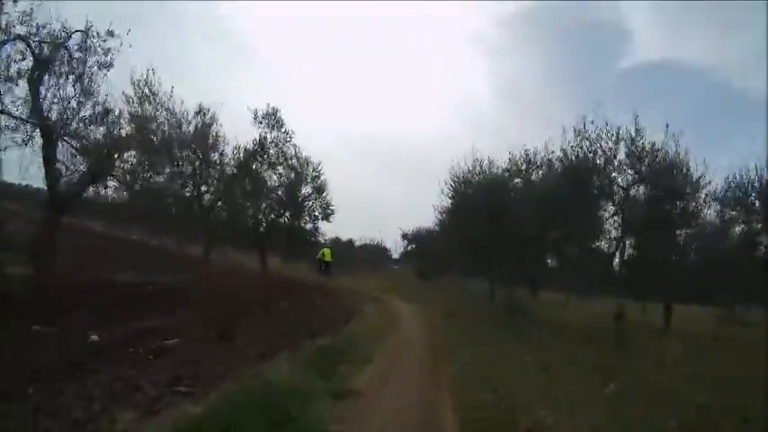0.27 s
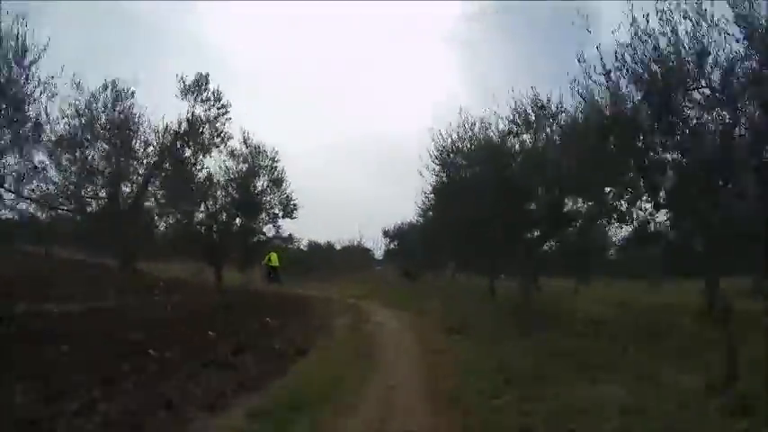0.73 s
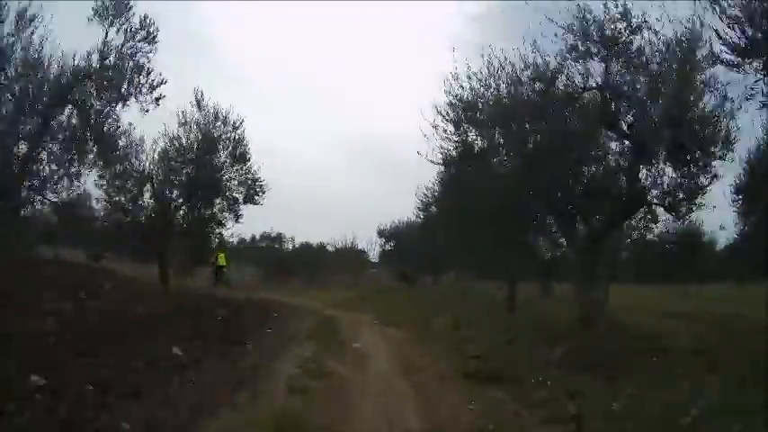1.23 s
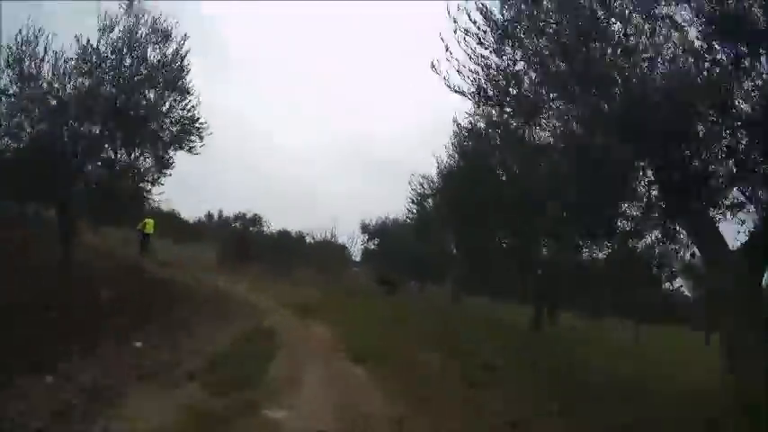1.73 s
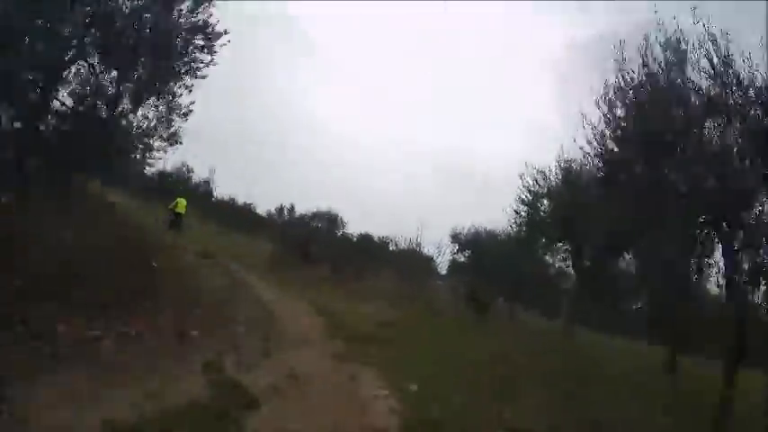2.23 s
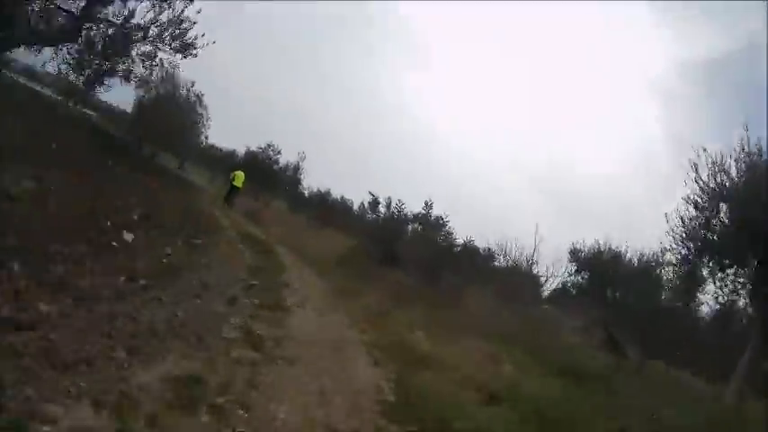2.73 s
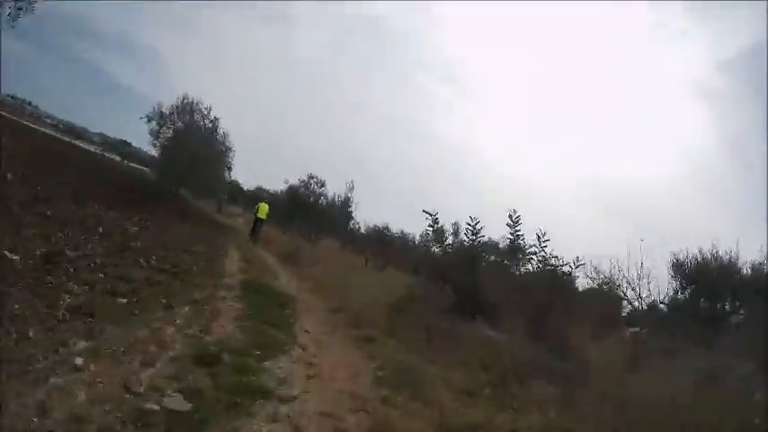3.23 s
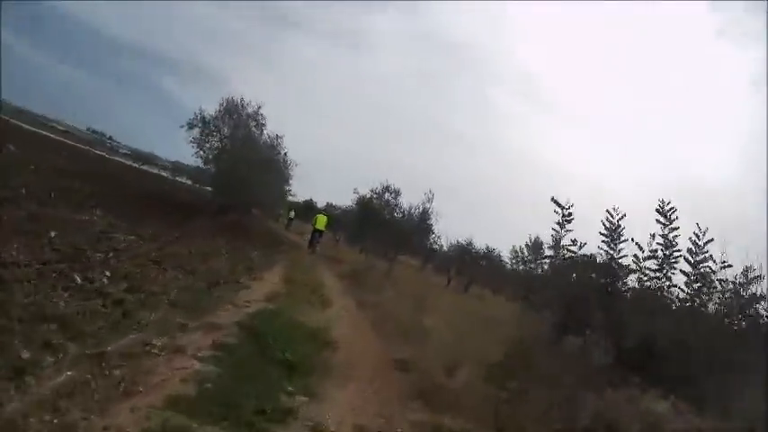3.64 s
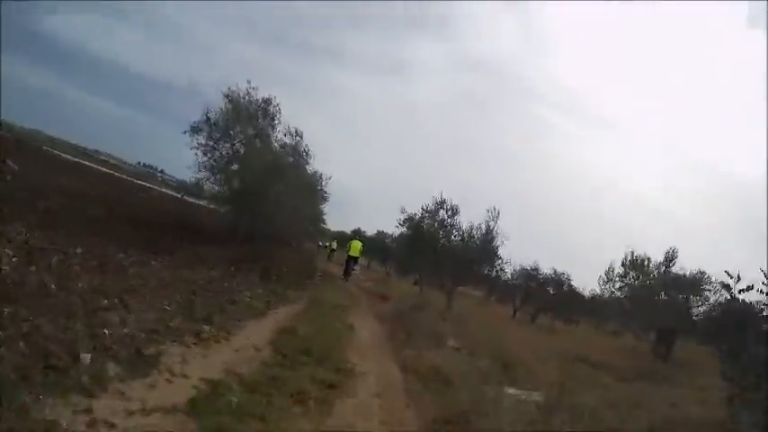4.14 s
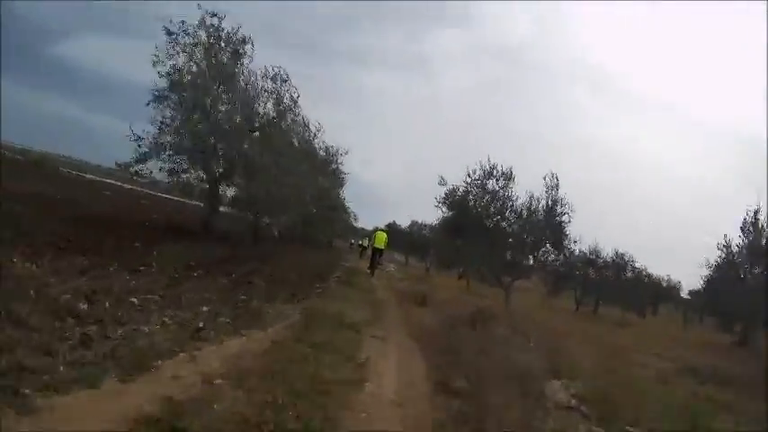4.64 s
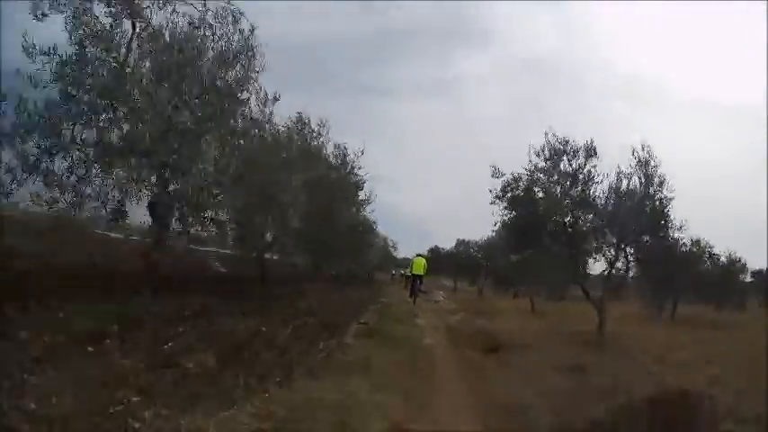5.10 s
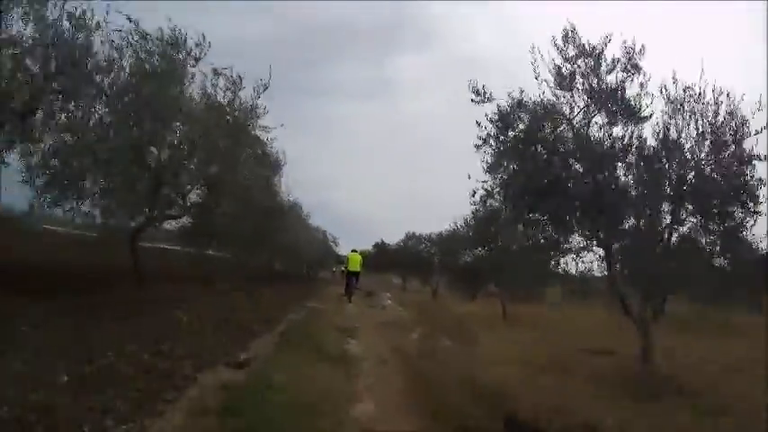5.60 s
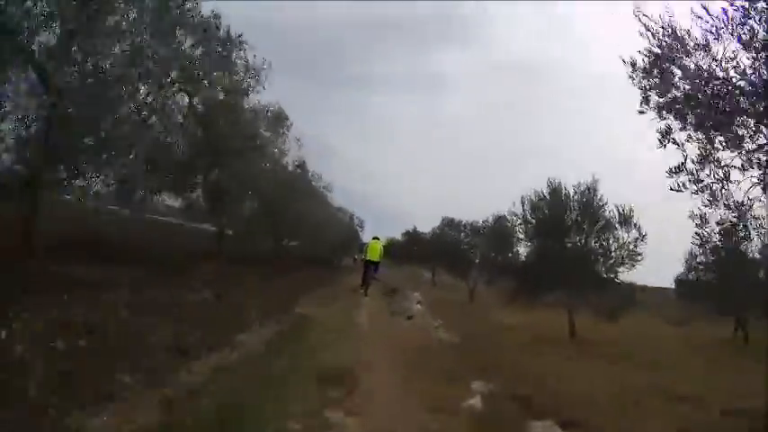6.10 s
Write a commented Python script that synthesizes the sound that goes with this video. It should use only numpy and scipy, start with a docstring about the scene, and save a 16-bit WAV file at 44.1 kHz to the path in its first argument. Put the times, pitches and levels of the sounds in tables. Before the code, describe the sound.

Low wind buffets a bike-mounted microphone over faint gritty tyre hiss, while the loose plastic mount ticks and rattles sharply, with a hard knock near the end.

```python
"""Camera on a bicycle, rough dirt track

Wind noise in four bands buffets the microphone port; single puffs thump its cavity.
Tyres hiss and roar over grit: flickering noise bands with random grains.
The camera ticks and rattles in its loose plastic mount, and the mount knocks on the handlebar:
bursts of noisy contacts ring banks of resonances. The input clips hard; the top is cut."""
import sys
import numpy as np
from scipy import signal
from scipy.io import wavfile
from scipy.ndimage import uniform_filter1d

SR = 44100
rng = np.random.default_rng(int(sys.argv[2]) if len(sys.argv) > 2 else 0)


def log_audio(samples):
    """Write samples as a 16-bit WAV file to the path given in sys.argv[1]."""
    # one column per channel
    frames = np.atleast_2d(samples).T
    # limit to full scale, then quantise
    limited = np.clip(frames, -1, 1)
    pcm = np.round(limited * 32767).astype(np.int16)
    wavfile.write(sys.argv[1], SR, pcm)


N = 280476   # samples

# wind at the port, before random swells and lumps: time_s, buffet_db, rumble_db, flutter_db
WIND_CURVE = [(0.0, -15, -23, -37.5), (0.21, -18, -23.5, -32), (0.55, -34, -33, -42), (0.65, -15, -20, -39),
              (0.69, -22, -29, -38), (1.2, -27.5, -31.5, -38.5), (1.29, -42, -26.5, -43),
              (1.33, -17, -28.5, -36.5), (1.42, -12, -18.5, -28), (1.45, -21, -32.5, -42.5),
              (1.57, -22.5, -28, -33), (1.91, -23.5, -32.5, -34), (2.02, -9.5, -18, -34.5),
              (2.09, -22.5, -28.5, -39), (2.21, -24, -27.5, -40), (2.76, -25.5, -34.5, -35),
              (2.8, -18, -25, -39), (3.1, -30, -32.5, -36), (3.17, -18, -23, -34.5),
              (3.47, -26, -31.5, -38.5), (3.88, -16, -23, -28), (4.02, -28, -26, -40),
              (4.22, -19, -24.5, -30.5), (4.29, -22, -28, -40), (4.82, -13, -17, -28.5),
              (4.85, -20, -21, -29.5), (4.92, -14, -32, -34.5), (4.99, -30, -22.5, -36),
              (5.23, -11, -26.5, -30), (5.31, -30, -26, -42), (5.38, -11.5, -23, -32),
              (5.53, -32, -21, -31), (5.56, -15.5, -26.5, -36), (6.15, -23, -22, -33),
              (6.31, -17.5, -34, -36), (6.36, -23, -18.5, -31)]
# ground roughness, heard as grit hiss: time_s, hiss_db
GROUND_CURVE = [(0.0, -49), (1.24, -51), (1.4, -42.5), (1.82, -46), (3.19, -46.5), (3.5, -44),
                (3.81, -46.5), (4.3, -43), (4.85, -45.5), (5.44, -42.5), (6.16, -42), (6.36, -45)]
# camera ticking in its mount: time_s, case_peak_db, mount_peak_db, length_ms
TICK_EVENTS = [(0.0898, -10.5, -29, 0.9), (0.1175, -21.5, -42, 1), (0.173, -21.5, -31, 1.6),
               (0.1975, -18, -32, 1.8), (0.3384, -34, -31, 0.83), (0.6045, -30.5, -37, .9),
               (1.3231, -42, -31, 1.7), (1.3502, -33, -29, 1.4), (1.372, -7, -18, 2.7),
               (1.4108, 1.5, -11.5, 2.7), (1.4463, -4.5, -17.5, 2.35), (1.4745, -24, -39, 1.1),
               (1.4888, -5, -17.5, 1.4), (1.5062, -10, -30, 2.1), (1.5274, -18, -30, 2.8),
               (1.5625, -24, -18, 1), (1.5799, -7, -21, 2), (1.6251, -9, -23.5, 1.7),
               (1.6998, -25.5, -43, 1.9), (1.8726, -12.5, -23.5, 3), (1.8898, -8, -25, 2.2),
               (1.9451, 0, -21, 1.8), (1.9647, -7.5, -21.5, 4.6), (1.9841, -7.5, -29, 1.9),
               (2.0279, -7, -18, 1.7), (2.066, -16.5, -30, 2.4), (2.1036, -10, -25, 2.6),
               (2.1192, -4.5, -15, 1.7), (2.1463, -17.5, -41, 2.3), (2.1655, -22, -31, 1.7),
               (2.2702, -22, -26, .82), (2.324, -19.5, -31.5, 4.2), (2.3764, -20, -48, 0.85),
               (2.4244, -14, -32, 1.5), (2.439, -31, -23.5, 1.7), (2.502, -16.5, -29, .9),
               (2.6116, -25, -32, .88), (2.6539, -17, -23, 1.6), (2.7794, -10.5, -27, 1.7),
               (2.8203, -5, -18.5, 1.24), (3.1017, -21.5, -46, .7), (3.1615, -13, -27, 1),
               (3.2166, -13.5, -30, 1.2), (3.2462, -18, -28, 1.3), (3.2848, -22.5, -25.5, 2.5),
               (3.3125, -11.5, -21.5, 1.8), (3.326, -9, -31, 1.3), (3.3686, -14.5, -24.5, 3.4),
               (3.3983, -3, -26, 1.4), (3.4268, -9.5, -26.5, .82), (3.4422, -31, -25.5, 1.7),
               (3.5002, -13, -26.5, .89), (3.5456, -28, -28, 2.2), (3.5701, -2.5, -23, 1.6),
               (3.5877, -3, -17, 2.5), (3.605, -15, -27, .81), (3.6283, -5.5, -25, 1.9),
               (3.658, -24, -30, 2.1), (3.6759, -12.5, -30, 3.5), (3.7177, -20.5, -48, 1.5),
               (3.7869, -7, -27, 2.4), (3.8097, -6.5, -20, 2.34), (3.8384, -29, -26.5, 2.5),
               (3.962, -20, -28, 0.8), (3.9726, -26.5, -24, 5.3), (4.0206, -35, -22.5, .6),
               (4.05, -25, -22, 0.92), (4.071, -4.5, -20, 1.44), (4.1377, -24, -23, 4),
               (4.1484, -2.5, -19, 1.5), (4.1931, -4, -19, 1.5), (4.2309, -28, -27, 2.7),
               (4.2425, -6.5, -17, 1.4), (4.2573, 4, -4, 4.1), (4.3066, -11, -27, 2.8),
               (4.368, -34, -24.5, 1.6), (4.4117, -2.5, -15.5, 6.5), (4.4471, -15.5, -29, .87),
               (4.5196, -24, -31, 5.3), (4.5534, -22, -30, .8), (4.5681, -24, -20, 1.8),
               (4.6053, -18, -32, 1.1), (4.6741, -11, -42, 1), (4.7472, -31, -17, 0.98),
               (4.7594, -12.5, -23, 1.7), (4.782, -11, -9.5, 3.7), (4.7915, -17, -16, 0.84),
               (4.798, -3, -32, 0.85), (4.8059, -23, -19, 2.3), (4.814, -18, -26, 1.4),
               (4.8282, -8.5, -21, 1.4), (4.8389, -8.5, -28, 1.9), (4.859, -17, -38, 2.2),
               (4.8984, -7, -16.5, 2.2), (4.938, -13, -29, 1.4), (5.058, -34, -27, 0.84),
               (5.0994, -8.5, -27, 1.4), (5.189, -3, -17, 3.5), (5.2005, -1, -27, 1),
               (5.204, -12, -30, 2.9), (5.2093, -10, -10, 3.6), (5.2246, -13, -6, 1.4),
               (5.2514, -9, -21, 2.3), (5.2949, -17, -21, 2.3), (5.3098, -7, -26, .6),
               (5.3809, -6, -23, 4.5), (5.3997, -1, -15.5, 2.3), (5.4169, -11, -33, 1.3),
               (5.4271, -4.5, -29, 1.4), (5.45, -13, -29, .82), (5.5513, -22, -24.5, 4.2),
               (5.6037, -0.5, -34, 3.1), (5.6367, -27, -36, 3.1), (5.6476, -26, -31, 2.6),
               (5.671, -17.5, -25, 1.9), (5.7154, -13, -30, 1.7), (5.7328, -22, -36, 1.3),
               (5.8292, -17, -31, 1.4), (5.8529, -13, -26, 1.2), (5.9045, -26, -22.5, 2.2),
               (5.9178, -14.5, -34, 2.1), (5.9643, -11.5, -27, 2.2), (5.9838, -8, -30, 2.8),
               (6.0356, -6.5, -35, 1.6), (6.0524, -2.5, -13, 3.06), (6.0914, 0, -27, 1.24),
               (6.1211, -3, -18, 2.2), (6.1645, -8.5, -23, 1.1), (6.1789, -1, -23, 0.85),
               (6.2034, -24, -33, 4.6), (6.2414, -10, -21.5, 2.7), (6.3091, -12.5, -28, .81)]
# sharp puffs of wind on the port, before the band-pass: time_s, peak_db
PUFF_EVENTS = [(1.408, -20), (1.534, -23), (1.559, -11.5), (3.774, -19), (3.8, -31), (3.818, -19),
               (3.834, -16), (3.851, -31), (3.867, -34), (3.877, -17), (3.884, -16), (4.782, -10)]
# mount knocking on the handlebar, before the band-pass: time_s, peak_db
KNOCK_EVENTS = [(1.411, -25), (1.56, -30), (3.881, -28), (3.97, -17), (4.257, -18.5), (4.414, -26),
                (4.781, -19), (5.151, -7), (5.163, -0.5), (5.197, -25), (5.217, -22.5), (5.225, -31),
                (5.295, -25.5), (5.603, -26)]
# contacts running together: start_s, fade_start_s, gain_db, fade_ms, handlebar_db
RATTLE_EVENTS = [(4.425, 4.424, -28, 3.9, -40), (4.756, 4.777, -34.5, 3, -44),
                 (4.783, 4.801, -27.5, 4.4, -34), (4.808, 4.822, -34.5, 7.2, -44),
                 (5.146, 5.154, -32, 2, -24), (5.153, 5.176, -13.5, 6, -16.5), (5.181, 5.183, -12, 3, -27),
                 (5.188, 5.226, -22.5, 5.7, -47)]

# spectrum of the grit noise, relative: frequency_hz, density_db_per_hz
GRIT_SPECTRUM = [(410, -25), (700, -8.5), (1250, -3.5), (2110, -3), (3300, -10.5), (6690, -10),
                 (8640, -6.5), (13200, -26.5), (14300, 4), (15000, -72)]
# resonances of the camera case: frequency_hz, width_hz, level_db
CASE_MODES = [(7710, 590, -10), (8690, 780, 7.5), (9330, 2000, 0), (11030, 1700, -8.5), (13400, 800, -19.5)]
# resonances of the latch: frequency_hz, width_hz, level_db
LATCH_MODES = [(4130, 7100, -21), (4460, 430, -1), (4980, 630, -3), (5920, 1260, -7)]
# resonances of the plastic mount: frequency_hz, width_hz, level_db
MOUNT_MODES = [(1270, 810, -15.5), (1860, 890, -6.5), (2160, 640, -0.5), (2826, 720, -6)]
# resonances of the handlebar: frequency_hz, width_hz, level_db
HANDLEBAR_MODES = [(624, 230, -10.5), (807, 57, -1), (990, 360, -11.5), (1158, 93, -1.5), (1424, 49, -15),
                   (1880, 180, -11)]
# resonances of the port cavity under wind: frequency_hz, width_hz, level_db
PORT_MODES = [(270, 113, 6.5), (483, 320, 3.5), (744, 1800, -10.5)]

RUSH_DB, RUSH_FOLLOWS = -46.5, 0.55     # rush at mean flutter; share of flutter's dB swing
SWELL_DB = 1.5                          # spread of random buffet and rumble swells
ROAR_DB, ROAR_FOLLOWS = -47, 0.49       # tyre roar on mean ground; share of the hiss's dB swing
LATCH_DB, LATCH_FOLLOWS = -8.5, 0.81    # mean latch peak at a 0 dB case tick; dB per case dB
FAINT_COUNT, FAINT_MS = 90, 1.42        # random ticks; median length
FAINT_CASE_DB, FAINT_MOUNT_DB, FAINT_SPREAD_DB = -39.5, -31.5, 6   # levels on mean ground
CLIP_LEVEL = 0.46                       # of full scale
ROLLOFF_HZ, CUTOFF_HZ = 14000, 15500    # low-pass corner; 40 dB stop-band edge


def from_db(db):
    """Decibels to amplitude gain."""
    return 10 ** (np.asarray(db) / 20)


def rms_one(x):
    """Scale to rms 1."""
    return x / np.sqrt(np.mean(x ** 2) + 1e-20)


def in_time(rows):
    """Interpolate each column of a curve table to one value per sample."""
    time_s, *columns = np.transpose(rows)
    return [np.interp(np.arange(N) / SR, time_s, column) for column in columns]


def band(x, low_hz, high_hz, order=2):
    """Butterworth band-pass."""
    sos = signal.butter(order, [low_hz, high_hz], "band", fs=SR, output="sos")
    return signal.sosfilt(sos, x)


def drift(rate_hz):
    """Slow random curve, rms 1: noise at SR / 40 through two equal real poles at rate_hz."""
    step, settle = 40, 2000
    r = np.exp(-2 * np.pi * rate_hz * step / SR)
    noise = rng.standard_normal(N // step + settle + 2)
    slow = signal.lfilter([1], [1, -2 * r, r * r], noise)[settle:]
    return np.interp(np.arange(N) / step, np.arange(len(slow)), rms_one(slow))


def evened(x, span_s):
    """Flatten the slow swells of noise, so that the level curves shape it."""
    return x / np.sqrt(uniform_filter1d(x ** 2, round(span_s * SR)) + 1e-12)


def resonate(x, modes, spread_db=0):
    """Parallel two-pole resonances of alternating sign; each row of x gets its own mode strengths."""
    out = 0
    luck = rng.standard_normal(x.shape[:-1] + (len(modes),))
    for k, (hz, width_hz, level_db) in enumerate(modes):
        r = np.exp(-np.pi * max(width_hz, 10) / SR)
        poles = [1, -2 * r * np.cos(2 * np.pi * hz / SR), r * r]
        rung = signal.lfilter([1, 0, -1], poles, x + 1e-18)
        unity = (1 - r * r) / 2   # peak gain 1
        gain = from_db(level_db + spread_db * luck[..., k:k + 1])
        out = out + (-1) ** k * unity * rung * gain
    return out


def strikes(times_s, peak_db, chatter_ms, modes, spread_db, size):
    """Noisy contacts swell in, chatter, ring the modes and leave a weak afterbounce."""
    ms = np.arange(size) / SR * 1000
    late_ms = np.maximum(ms - np.reshape(chatter_ms, (-1, 1)), 0)
    rebound_ms = rng.uniform(3.2, 13.0, (len(times_s), 1))
    rebound = 1 + 1.7 * np.exp(-((late_ms - rebound_ms) / 0.63) ** 2)
    afterbounce = 0.071 * rebound * np.exp(-late_ms / 6.1)
    swell_in = np.minimum(ms / 0.44, 1) ** 2
    shape = swell_in * (np.exp(-late_ms / 0.46) + afterbounce)
    rung = resonate(shape * rng.standard_normal((len(times_s), size)), modes, spread_db)
    # peak_db: peak of a sine as strong as the loudest 40 samples
    strongest = uniform_filter1d(rung ** 2, size=40).max(axis=1)
    rung *= (from_db(peak_db) / np.sqrt(2 * strongest))[:, None]
    out = np.zeros(N + size)
    for time_s, one in zip(times_s, rung):
        first = round(time_s * SR)
        out[first:first + size] += one
    return out[:N]


def wind():
    """Eddies at the port: lumpy pressure noise in four bands, each with its own level curve."""
    buffet_db, rumble_db, flutter_db = in_time(WIND_CURVE)
    rush_db = RUSH_DB + RUSH_FOLLOWS * (flutter_db - flutter_db.mean())
    buffet_db = buffet_db + SWELL_DB * drift(6.3)
    rumble_db = rumble_db + SWELL_DB * drift(6.0)
    white = rng.standard_normal((4, N + SR))   # first second lets the filters settle
    buffet = evened(band(white[0], 12.5, 34.2)[SR:], span_s=0.347)
    rumble = evened(band(band(white[1], 45.7, 72.2, order=1), 41.0, 115.0)[SR:], span_s=0.13)
    flutter = evened(band(band(white[2], 104, 196, order=1), 111, 386)[SR:], span_s=0.085)
    rush = evened(band(band(white[3], 122, 360, order=1), 424, 1060)[SR:], span_s=0.12)
    lumps = drift(28)   # small eddies come in lumps
    return (from_db(buffet_db) * buffet
            + from_db(rumble_db + 0.24 * lumps) * rumble
            + from_db(flutter_db + 2.0 * lumps) * flutter
            + from_db(rush_db + 2.17 * lumps) * rush)


def tyres():
    """Grit under the tread: flickering third-octave noise, roughened by random grains."""
    hiss_db, = in_time(GROUND_CURVE)
    roar_db = ROAR_DB + ROAR_FOLLOWS * (hiss_db - hiss_db.mean())
    rough = np.clip((hiss_db + 58.5) / 9.2, .3, 1.5)   # louder ground is more uneven
    grains = (rng.random(N) < 90.0 * rough / SR) * rng.choice([-1, 1], N)
    grains = grains * from_db(3.5 * rough * np.minimum(rng.exponential(1, N), 3))
    crackle = uniform_filter1d(np.abs(grains), size=30) * 15.0   # a grain grinds for 0.7 ms
    hz, density_db = np.transpose(GRIT_SPECTRUM)
    edges_hz = 600 * 2 ** np.arange(0, 4.8, 1 / 3)
    together = drift(31)   # flicker shared by all bands
    white = rng.standard_normal((2, N))
    roar, hiss = 0, 0
    for k, (low_hz, high_hz) in enumerate(zip(edges_hz, edges_hz[1:])):
        band_db = np.interp(np.log(low_hz * high_hz) / 2, np.log(hz), density_db)
        flicker_db = rough * (1.6 * together + 2.07 * drift(21.4))
        one = from_db(band_db + flicker_db) * band(white[k % 2] * (1 + crackle), low_hz, high_hz)
        if high_hz < 3400:
            roar = roar + one
        else:
            hiss = hiss + one
    hiss = band(hiss, 870, 12800, order=6)
    return from_db(roar_db) * rms_one(roar) + from_db(hiss_db) * rms_one(hiss)


def faint_ticks():
    """Rows of random faint touches, more often and stronger on rough ground."""
    hiss_db, = in_time(GROUND_CURVE)
    luck = np.clip(rng.standard_normal((FAINT_COUNT, 3)), -2, 2)
    share = np.cumsum(from_db(hiss_db))
    at = np.searchsorted(share / share[-1], rng.uniform(.002, .998, FAINT_COUNT))
    rough_db = 1.03 * (hiss_db[at] - hiss_db.mean())
    case_db = FAINT_CASE_DB + rough_db + FAINT_SPREAD_DB * luck[:, 0]
    mount_db = FAINT_MOUNT_DB + rough_db + 0.46 * FAINT_SPREAD_DB * luck[:, 1]
    length_ms = FAINT_MS * np.exp(0.21 * luck[:, 2])
    return np.transpose([at / SR, case_db, mount_db, length_ms])


def ticks():
    """Case, latch and mount each ring with their own strength at every touch."""
    touches = np.vstack([TICK_EVENTS, faint_ticks()])
    time_s, case_db, mount_db, length_ms = np.transpose(touches)
    # the latch is hit more or less squarely
    latch_db = LATCH_DB + LATCH_FOLLOWS * case_db + 2.7 * rng.standard_normal(len(time_s))
    start_s = time_s - .0005   # case and latch contact begins just before the swell is heard
    chatter_ms = np.maximum(length_ms - .3, .7)
    case = strikes(start_s, case_db, chatter_ms, CASE_MODES, spread_db=2.0, size=700)
    latch = strikes(start_s, latch_db, chatter_ms, LATCH_MODES, spread_db=1.0, size=700)
    mount = strikes(time_s, mount_db, chatter_ms, MOUNT_MODES, spread_db=3.0, size=700)
    return case + latch + mount


def puffs():
    """Single eddies break at the port and thump its cavity; air carries no sharp edge."""
    time_s, peak_db = np.transpose(PUFF_EVENTS)
    chatter_ms = np.full(len(time_s), 1.5)
    thumps = strikes(time_s, peak_db, chatter_ms, PORT_MODES, spread_db=0.5, size=1500)
    return band(thumps, 80, 1400)


def knocks():
    """Hard jolts ring the handlebar through a soft rubber contact, which dulls the blow."""
    time_s, peak_db = np.transpose(KNOCK_EVENTS)
    chatter_ms = np.full(len(time_s), 1.5)
    blows = strikes(time_s, peak_db, chatter_ms, HANDLEBAR_MODES, spread_db=4.0, size=4000)
    return band(blows, 240, 3000)


def rattles():
    """Some 700 uneven contacts a second shake case, latch, mount and handlebar together."""
    t = np.arange(N) / SR
    gate, bar_gate = np.zeros(N), np.zeros(N)
    rise_s = 0.0035
    for start_s, fade_start_s, gain_db, fade_ms, bar_db in RATTLE_EVENTS:
        rise = np.clip((t - start_s + rise_s) / rise_s, 0, 1) ** 2
        shape = rise * np.exp(-np.clip(t - fade_start_s, 0, 1) * 1000 / fade_ms)
        gate = gate + from_db(gain_db) * shape
        bar_gate = bar_gate + from_db(bar_db) * shape
    touches = (rng.random(N) < 700.0 / SR) * from_db(2.7 * rng.exponential(1, N))
    grind = signal.lfilter([.04], [1, -.96], touches)   # each touch grinds briefly
    contacts = rng.standard_normal(N) * (0.032 + grind)
    bright = rms_one(resonate(contacts, [*CASE_MODES, *LATCH_MODES]))
    wide = rms_one(band(contacts, 810, 14500))
    mount = rms_one(resonate(contacts, MOUNT_MODES))
    handlebar = rms_one(resonate(contacts, HANDLEBAR_MODES))
    return gate * (bright + 1.7 * wide + 0.14 * mount) + bar_gate * handlebar


def scene():
    """Sum of all layers at one microphone."""
    return (wind() + tyres() + ticks() + puffs() + knocks() + rattles())[None]


def record(dry):
    """Hard clip at the input, then treble roll-off and a steep top cut."""
    clipped = np.clip(dry, -CLIP_LEVEL, CLIP_LEVEL)
    rolled = signal.sosfilt(signal.butter(12, ROLLOFF_HZ, fs=SR, output="sos"), clipped)
    return signal.sosfilt(signal.cheby2(12, 40, CUTOFF_HZ, fs=SR, output="sos"), rolled)


dry = scene()
out = record(dry)
log_audio(out)
```